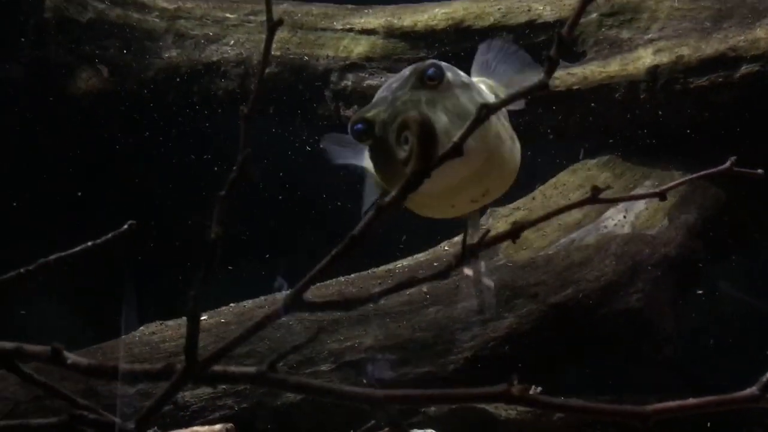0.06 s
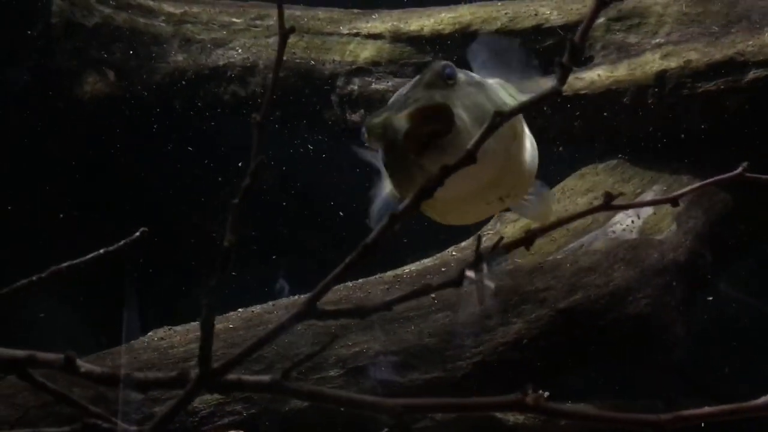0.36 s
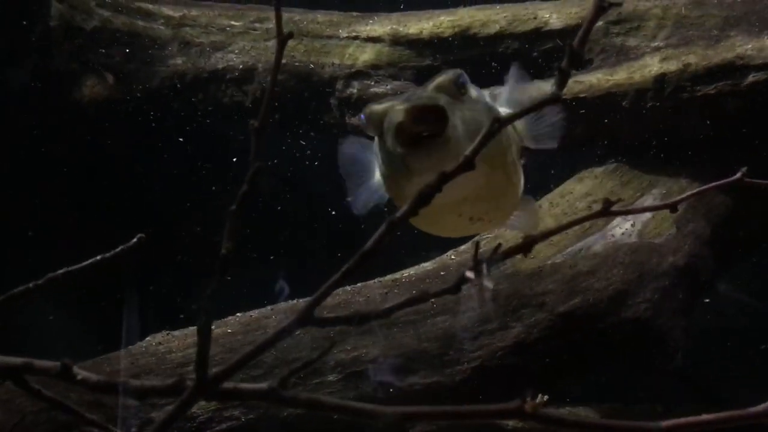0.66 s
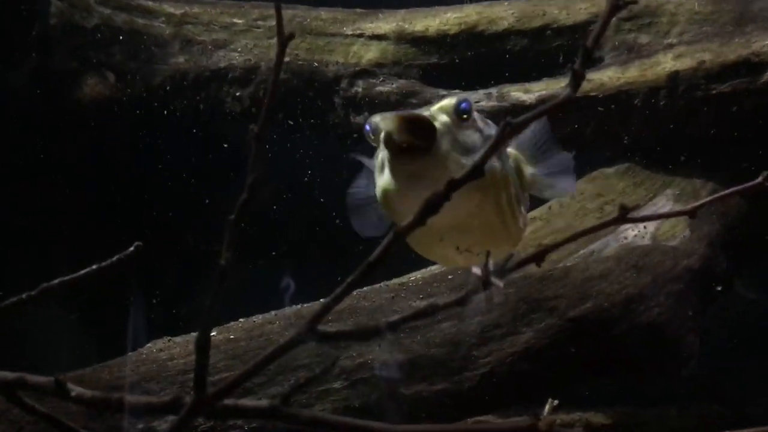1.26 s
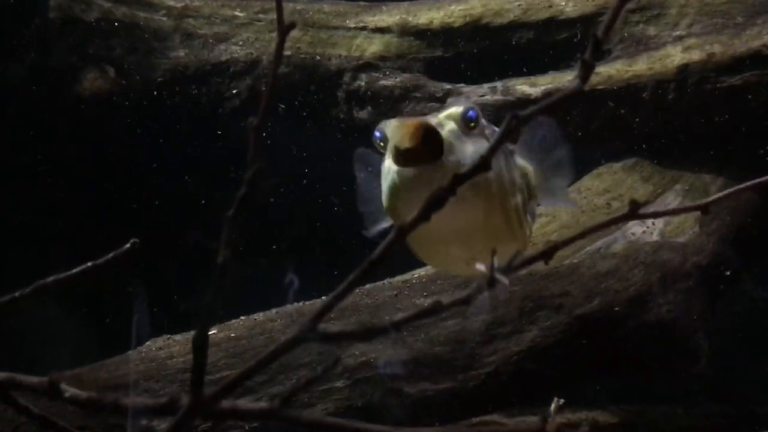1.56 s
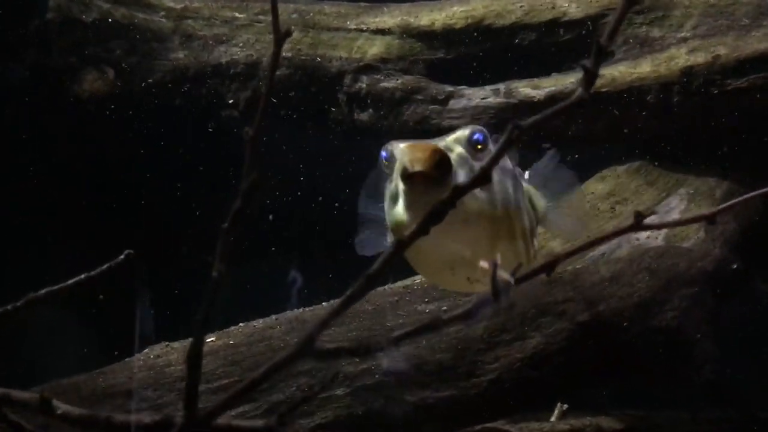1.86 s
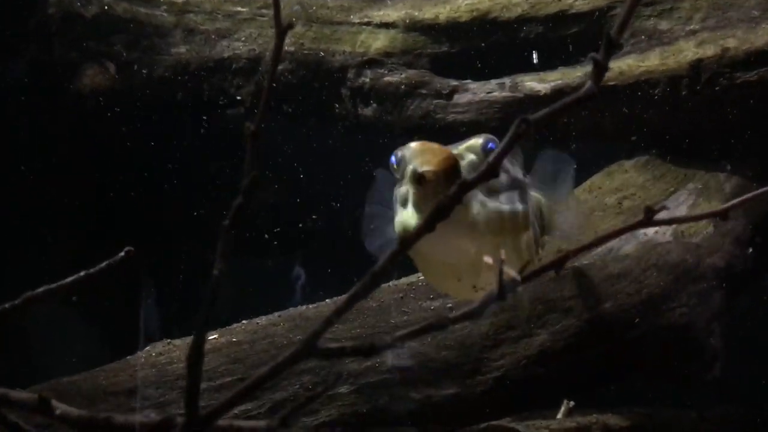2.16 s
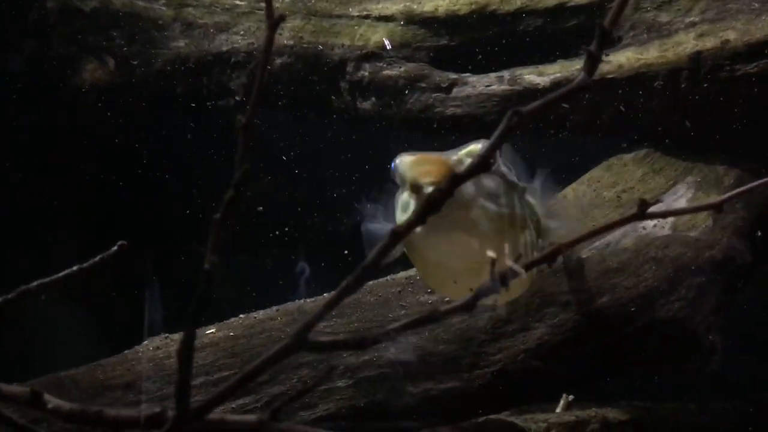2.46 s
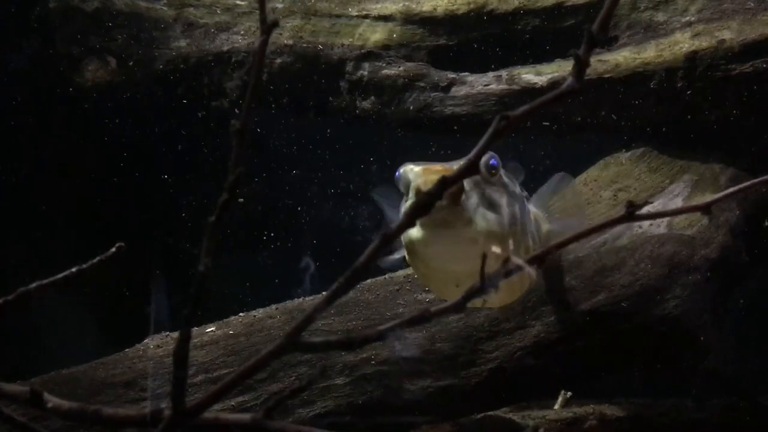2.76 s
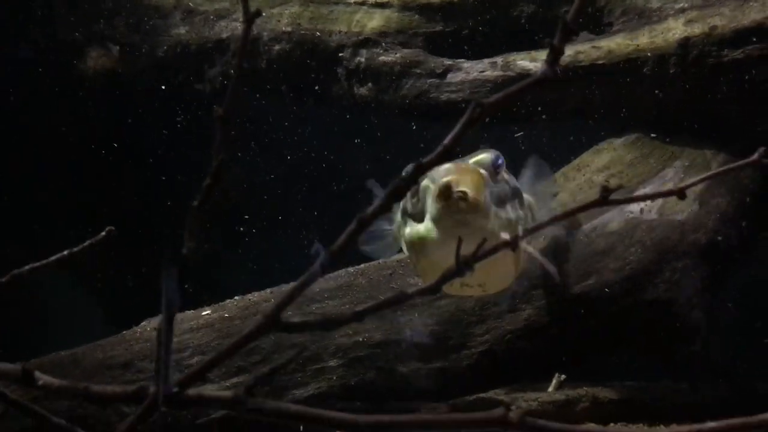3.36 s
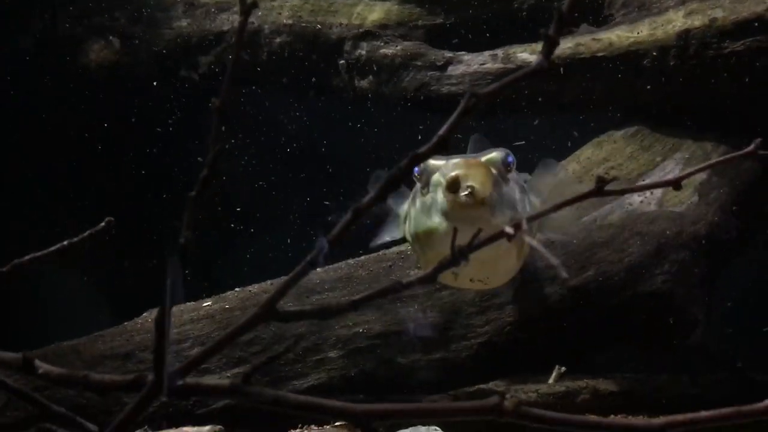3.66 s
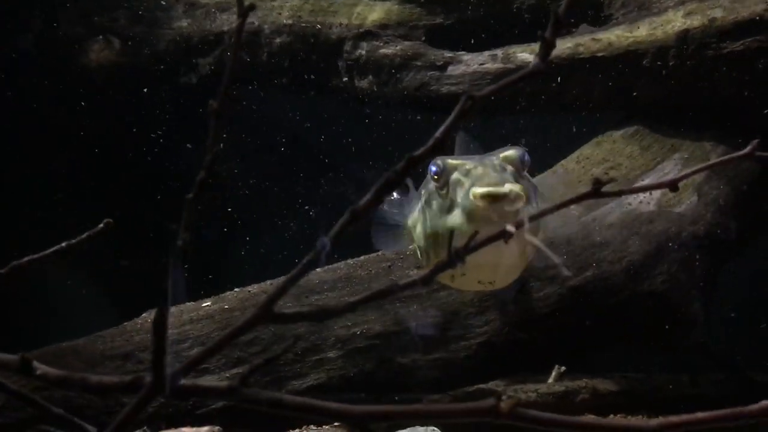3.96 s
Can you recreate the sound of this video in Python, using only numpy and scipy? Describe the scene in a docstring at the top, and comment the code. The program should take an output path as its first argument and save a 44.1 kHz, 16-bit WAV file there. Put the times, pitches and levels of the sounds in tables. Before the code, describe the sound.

A pufferfish crunches a snail shell in three quick, sharp bites that ring briefly in the aquarium. A weaker crack, small ticks and faint scraping follow, heard close up over a steady pump hum and soft circulating water.

```python
"""A pufferfish crushes a snail shell in an aquarium, heard close up on one microphone.
Three quick bites, each a cluster of sharp fractures, rattle between the panes and ring in the tank.
Teeth tap the whole shell first and scrape it near the end; chips tick before and after the bites,
and one small bubble rings. Behind the fish, the pump hums on the mains over a soft wash of water."""
import sys
import numpy as np
from scipy import signal
from scipy.fft import rfft, irfft, next_fast_len
from scipy.io import wavfile
from scipy.ndimage import map_coordinates

SR = 44100
rng = np.random.default_rng(int(sys.argv[2]) if len(sys.argv) > 2 else 0)


def to_wav(sig):
    """Store sig (one row per channel, or 1-D mono) as 16-bit WAV at the path in sys.argv[1].

    Samples outside -1..1 are clipped; the rate is SR.
    """
    pcm = np.clip(np.atleast_2d(sig), -1, 1) * 32767
    pcm = np.round(pcm).astype(np.int16)
    wavfile.write(sys.argv[1], SR, pcm.T)  # frames by channels


N = 176400

# shell fractures: t/s, level/dB, low cut f/Hz, broken piece's f/Hz, treble tilt/(dB/octave), rattle/dB
FRACTURES = [(1.2682, -30, 2800, 12000, 0.5, 4.5), (1.2714, -27, 2800, 11500, 5, -8),
             (1.2762, -36, 4000, 9500, -2, 4), (1.2839, -8.5, 637, 2220, -0.5, -2),
             (1.3028, -32, 1800, 2400, -2, -2), (1.3075, -39, 3000, 11000, -1, 5),
             (1.3182, -39, 3000, 11000, 2, -3), (1.4388, -39.5, 2800, 4700, -3, 0),
             (1.4455, -35.5, 2500, 4700, -7, 1), (1.4622, -28, 850, 1100, -1, -11),
             (1.475, -27.5, 1000, 5000, -3, -7), (1.4763, -29, 2500, 12500, -5, -10),
             (1.4817, -17.5, 1150, 1410, 1.5, 0.5), (1.488, -26, 2500, 4770, -3, -3),
             (1.5109, -32.5, 1000, 12500, 0, -12), (1.6984, -39, 3500, 6500, -7, 3),
             (1.705, -37, 1200, 9500, -.5, 2), (1.7061, -25.5, 1100, 1100, 1, -12),
             (1.7127, -24, 2900, 4400, -1.5, -4), (1.7228, -23, 1000, 1420, -1, -3.5),
             (1.7307, -24.5, 1240, 1450, -4.5, -2.5), (1.7435, -43, 1500, 5000, 1, -5),
             (1.7492, -37, 1100, 1400, -5, 0), (2.5674, -43, 2000, 5000, -11, 2),
             (2.5830, -32, 780, 4400, -7, -10), (2.5878, -35.5, 850, 980, -7, -15)]
# spectrum of the breaking shell: f/Hz, level/dB
SHELL_SPECTRUM = [(300, -2), (700, -4), (1000, -1), (1400, .5), (2000, -8.5), (2700, -1.5), (4000, -11),
                  (5000, -14.5), (5900, -6.5), (7500, -10), (9500, -16), (12000, -18), (16000, -23.5)]
PIECE_GAIN, PIECE_WIDTH = 1.8, 0.17  # extra gain at the piece's own pitch; bandwidth over pitch
# modes of the tank: f/Hz, level/dB, t60/s
TANK_MODES = [(920, -41, .06), (1020, -28, 0.037), (1420, -37, .045), (1560, -35, 0.026),
              (1920, -28, 0.027), (2060, -28.5, .05), (2440, -36, 0.043), (2704, -32.5, 0.035),
              (5500, -40, 0.086)]
# spectrum of the tank's diffuse ring: f/Hz, level/dB
TAIL_SPECTRUM = [(400, -1), (900, 3), (1400, 2), (2400, 1.5), (3300, -11), (5700, -7), (8000, -10),
                 (16000, -6.5)]
RATTLE_T60_S, TAIL_T60_S, TAIL_DB, MODES_DB = 0.016, 0.15, -11, -10
# chips ground between the jaws: t/s, level/dB, f/Hz, bandwidth over pitch, t60/s
CHIP_TICKS = [(1.151, -40, 8400, .2, 0.077), (1.219, -51, 12500, .1, .03), (1.973, -50, 10500, .2, .015),
              (2.301, -44, 4700, .2, .02), (3.4750, -33, 5500, .35, 0.0032),
              (3.4789, -31.5, 4960, 0.22, 0.006), (3.4810, -43, 5600, .35, .006),
              (3.49, -46, 4800, .4, .015), (3.5032, -41, 5400, .4, .01), (3.5134, -37, 5600, 0.32, .004),
              (3.5363, -29.5, 5050, .35, .004), (3.862, -38.5, 5470, .5, .02),
              (3.9017, -35, 4770, 0.066, 0.0083), (3.9027, -44, 10000, .4, .004),
              (3.9068, -40, 5000, .12, .012), (3.9700, -47, 1800, .5, .006)]
CHIP_SNAP_DB, CHIP_TAIL_DB, CHIP_TOP_HZ = -7, -7, 10900
# teeth scraping over shell: t/s, length/s, rms level/dB, f/Hz
SCRAPE_STROKES = [(3.472, 0.046, -57, 4400), (3.925, .055, -64, 4900), (3.93, 0.044, -60, 1880)]
SLIPS_PER_S, GRIT_WIDTH = 1200, 0.24  # width is bandwidth over pitch
# teeth tapping the whole shell: t/s, level/dB
TOOTH_TAPS = [(.2922, -36.5), (.3060, -37), (0.314, -45)]
# modes of the unbroken shell: f/Hz, level/dB, t60/s
SHELL_MODES = [(3350, -10, .03), (3560, -17, 0.018), (5560, -8, 0.026), (5730, -14, .02),
               (9750, -15.5, .022), (12200, -25, .015)]
BUBBLE_S, BUBBLE_DB, BUBBLE_HZ, BUBBLE_T60_S = 0.735, -39.5, 1620, 0.049
# pump hum: multiple of the mains, rms level/dB
HUM_HARMONICS = [(1, -69.5), (2, -37.5), (3, -68.5), (4, -52.5), (5, -66.5), (6, -58.5), (7, -67), (8, -50),
                 (10, -86.5), (11, -72), (12, -70), (15, -75), (16, -66), (18, -73.5), (22, -71), (24, -66),
                 (28, -67)]
MAINS_HZ, HUM_WAVER, HUM_DRIFT = 50.025, 0.0043, 0.024  # level waver and phase drift grow with harmonic
# spectrum of the circulating water: f/Hz, relative level/dB
WASH_SPECTRUM = [(20, -20), (45, 2), (100, 2), (170, -0.5), (300, -2), (450, 3.5), (570, 3), (700, -6),
                 (1000, -3.5), (1330, 3.5), (1700, -4.5), (2050, -9), (2280, -1.5), (2520, -8.5),
                 (2650, -7), (3000, -12.5), (3900, -13), (4300, -14.5), (4540, -11.5), (4900, -20),
                 (5500, -12), (6100, -10), (7000, -19.5), (7800, -20.5), (9400, -19.5), (10400, -26.5),
                 (11700, -23), (14000, -30), (15700, -33), (16300, -62)]
# slow swell of the water's middle register: t/s, level/dB
WASH_SWELL = [(0, 0), (.8, 1), (1.3, .5), (2, -0.5), (2.5, 0.5), (2.9, 0.5), (3.4, -1), (4, 1.5)]
WASH_DB, RECORDER_TOP_HZ = -55, 16400


def bites():
    """Each fracture is one pressure pulse; smaller ones lack bass. The panes throw it back and ring."""
    out = np.zeros(N)
    for start, db, low_hz, piece_hz, tilt_db, rattle_db in FRACTURES:
        def spectrum(f):
            shell = amp(curve_at(SHELL_SPECTRUM, f) + tilt_db * np.log2(1 + f / 1500))
            piece = 1 + PIECE_GAIN * resonance(f, piece_hz, PIECE_WIDTH)
            return shell * piece / np.sqrt(1 + (low_hz / (f + 1)) ** 6)
        response = amp(rattle_db) * decay(ring_noise(), RATTLE_T60_S)
        response += amp(TAIL_DB) * tank_tail() + amp(MODES_DB) * ringing(TANK_MODES)
        response[0] += 1  # the direct path to the microphone
        add(out, start, amp(db) * signal.fftconvolve(pulse(spectrum), response))
    return out


def chips():
    """Each chip gives a tiny snap and a brief gritty ring at its own pitch, then the tank answers."""
    out = np.zeros(N)
    for start, db, hz, width, t60 in CHIP_TICKS:
        click = pulse(lambda f: chip_band(f, hz, width))
        response = decay(ring_noise(), t60) + amp(CHIP_TAIL_DB) * tank_tail()
        response[0] += amp(CHIP_SNAP_DB)
        add(out, start, amp(db) * signal.fftconvolve(click, response))
    return out


def scrapes():
    """Dense tiny slips as the teeth slide over the shell."""
    out = np.zeros(N)
    for start, length, db, hz in SCRAPE_STROKES:
        slips = rng.standard_normal(N) * (rng.random(N) < SLIPS_PER_S / SR)
        grit = unit_rms(filtered(slips, lambda f: chip_band(f, hz, GRIT_WIDTH)))
        stroke = signal.windows.tukey(int(length * SR))
        add(out, start, amp(db) * stroke * grit[:len(stroke)])
    return out


def taps():
    """The unbroken shell rings briefly against the teeth."""
    out = np.zeros(N)
    for start, db in TOOTH_TAPS:
        hiss = filtered(ring_noise(), lambda f: (f > 2500) * (f < 11000))
        grit = amp(4.5) * decay(hiss, t60=0.022)
        add(out, start, amp(db) * (ringing(SHELL_MODES) + grit))
    return out


def tank_tail():
    """The diffuse ring of water and glass around the fish."""
    return decay(filtered(ring_noise(), lambda f: amp(curve_at(TAIL_SPECTRUM, f))), TAIL_T60_S)


def bubble():
    """A small air bubble rings softly for a moment."""
    out, t = np.zeros(N), ring_time()
    envelope = amp(BUBBLE_DB - 60 * t / BUBBLE_T60_S) * (1 - np.exp(-t / 0.0023))
    add(out, BUBBLE_S, envelope * np.sin(2 * np.pi * BUBBLE_HZ * t))
    return out


def pump():
    """In the background the pump hums on harmonics of the mains, wavering very slightly."""
    t = np.arange(N) / SR
    out = np.zeros(N)
    for harmonic, db in HUM_HARMONICS:
        phase = 2 * np.pi * (harmonic * MAINS_HZ * t + rng.random())
        phase += HUM_DRIFT * np.sqrt(harmonic / 10) * wobble(6.3)
        waver = 1 + HUM_WAVER * (harmonic - 1) / 2 * wobble(4.11)
        out += np.sqrt(2) * amp(db) * waver * np.sin(phase)
    return out


def water():
    """Circulating water: noise in the tank's resonances, its middle register gently churning."""
    wash = unit_rms(filtered(rng.standard_normal(N), lambda f: amp(curve_at(WASH_SPECTRUM, f))))
    middle = filtered(wash, lambda f: resonance(f, hz=2000, width=0.87))
    swell_db = np.interp(np.arange(N) / SR, *np.transpose(WASH_SWELL))
    churn_db = swell_db + 1.2 * wobble(4.95) + 0.29 * wobble(30.16)
    return amp(WASH_DB) * (wash + middle * (amp(churn_db) - 1))


def pulse(spectrum, size=2048):
    """The shortest causal click with this spectrum, peak 1."""
    cepstrum = irfft(np.log(np.maximum(spectrum(np.fft.rfftfreq(size, 1 / SR)), 1e-6)))
    cepstrum[1:size // 2] *= 2  # fold onto positive time for minimum phase
    cepstrum[size // 2 + 1:] = 0
    click = irfft(np.exp(rfft(cepstrum)))
    return click / np.abs(click).max()


def ringing(modes):
    """Damped modes, struck a little differently each time."""
    t = ring_time()
    out = np.zeros(len(t))
    for hz, db, t60 in modes:
        envelope = amp(db + rng.normal(0, 3.5) - 60 * t / t60)
        detune = 1 + rng.normal(0, 0.0086)
        out += envelope * np.sin(2 * np.pi * hz * detune * t)
    return out


def decay(noise, t60):
    """Noise that rises sharply and dies away, energy 1."""
    t = ring_time()
    tail = noise * amp(-60 * t / t60) * (1 - np.exp(-t / 0.00013))
    return tail / np.linalg.norm(tail)


def resonance(f, hz, width):
    """Gain of a resonance, 1 at its centre; width is bandwidth over pitch."""
    return 1 / np.hypot(1, (f / hz - hz / (f + 1)) / width)


def chip_band(f, hz, width):
    """The resonance of a bit of shell, its top treble rolled off."""
    return resonance(f, hz, width) / np.sqrt(1 + (f / CHIP_TOP_HZ) ** 10)


def ring_time():
    """The 0.2 s time axis of one ringing sound."""
    return np.arange(SR // 5) / SR


def ring_noise():
    """White noise for one ringing sound."""
    return rng.standard_normal(len(ring_time()))


def wobble(rate):
    """A smooth random curve, rate knots a second."""
    return map_coordinates(rng.standard_normal(int(N * rate / SR) + 4), [np.arange(N) * rate / SR])


def filtered(x, gain):
    """Filter x by a gain that depends on frequency."""
    size = next_fast_len(len(x) + SR // 10)
    return irfft(rfft(x, size) * gain(np.fft.rfftfreq(size, 1 / SR)), size)[:len(x)]


def curve_at(points, hz):
    """Read (f/Hz, level/dB) points on a log frequency axis."""
    f, db = np.transpose(points)
    return np.interp(np.log(hz + 1), np.log(f + 1), db)


def amp(db):
    """Decibels to gain."""
    return 10 ** (np.asarray(db) / 20)


def unit_rms(x):
    """Scale to rms 1."""
    return x / np.sqrt(np.mean(x ** 2) + 1e-20)


def add(track, start_s, sound):
    """Mix a sound in at its start time."""
    part = track[round(start_s * SR):][:len(sound)]
    part += sound[:len(part)]


def scene():
    """The fish's meal in front, the sound of the tank behind, in mono."""
    return (bites() + chips() + scrapes() + taps() + bubble() + pump() + water())[None]


def record(dry):
    """The recorder cuts off steeply above its band limit."""
    return np.array([filtered(ch, lambda f: 1 / np.hypot(1, (f / RECORDER_TOP_HZ) ** 60)) for ch in dry])


dry = scene()
out = record(dry)
to_wav(out)
```